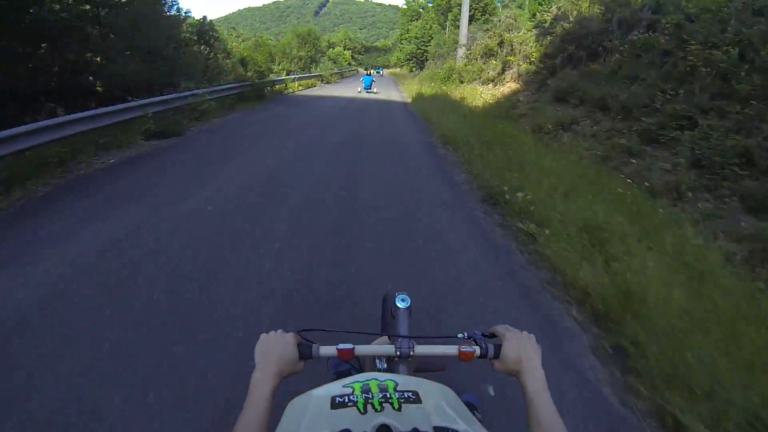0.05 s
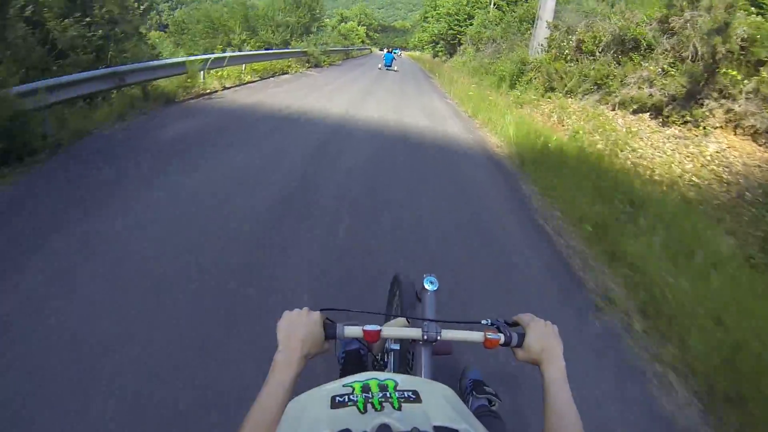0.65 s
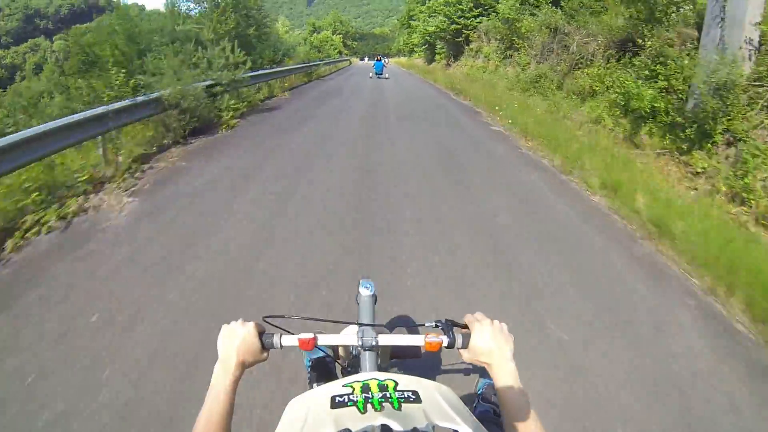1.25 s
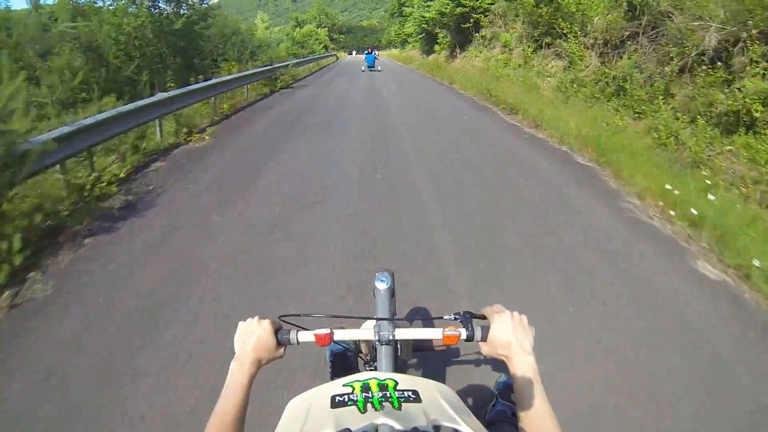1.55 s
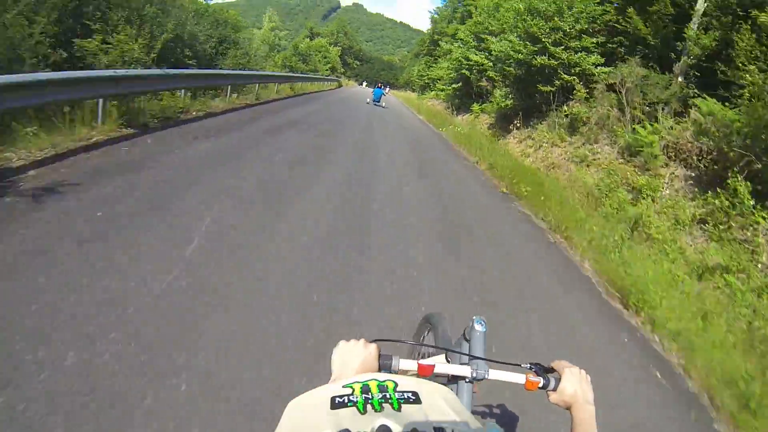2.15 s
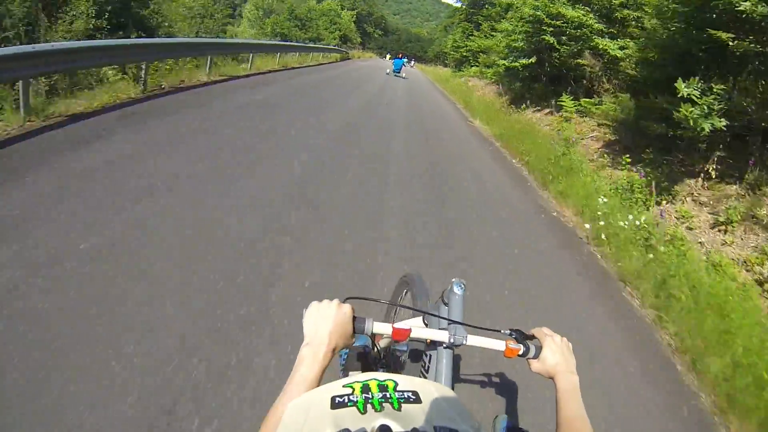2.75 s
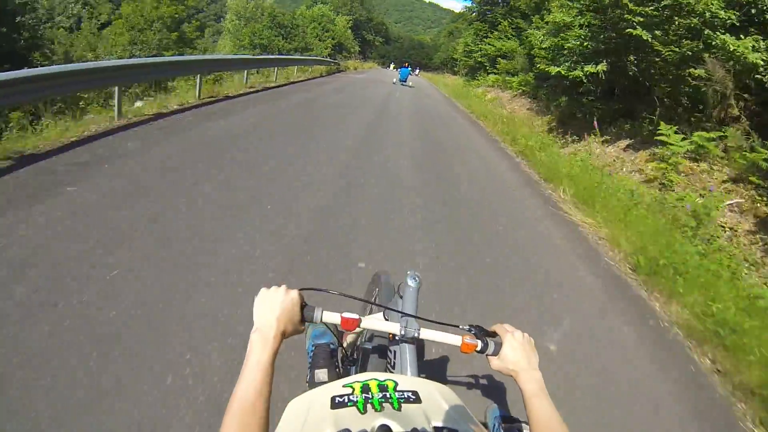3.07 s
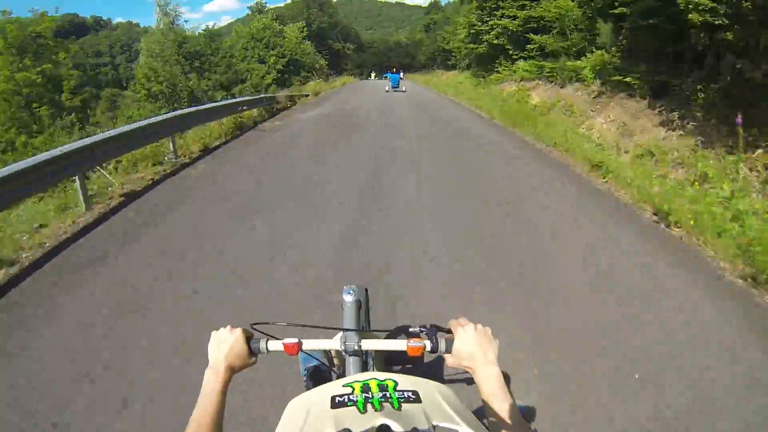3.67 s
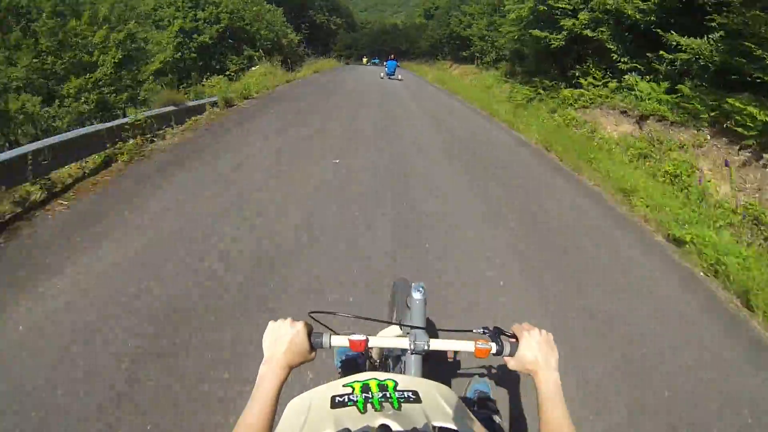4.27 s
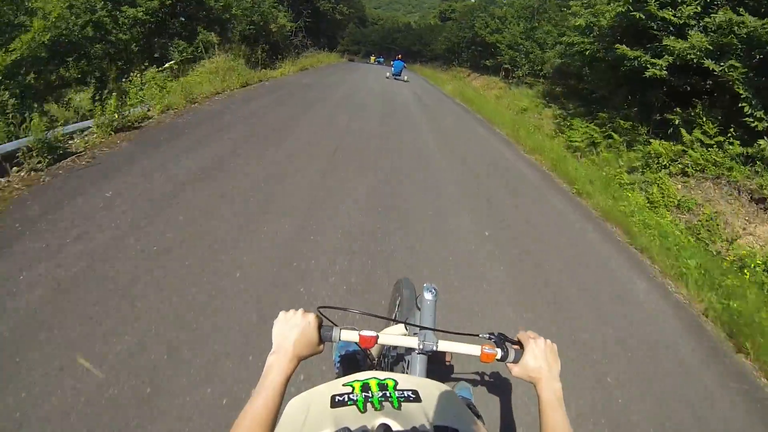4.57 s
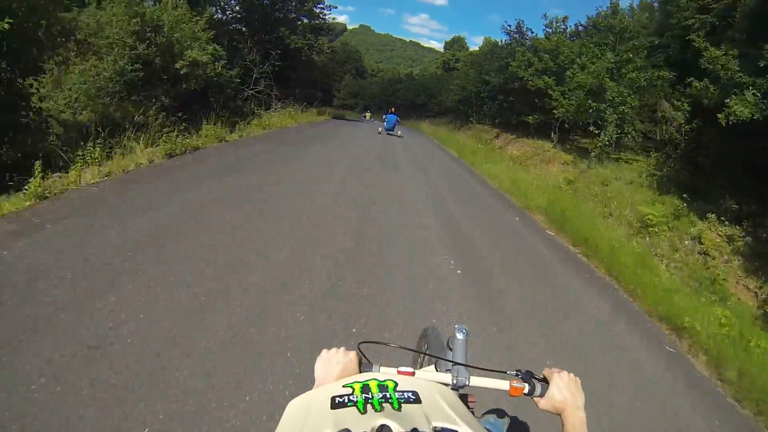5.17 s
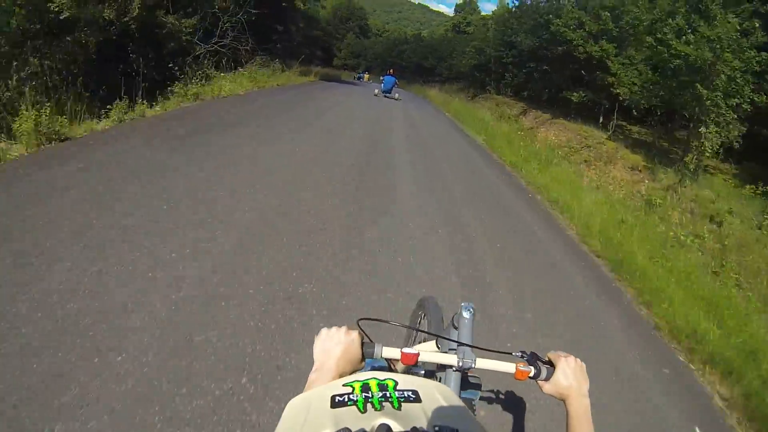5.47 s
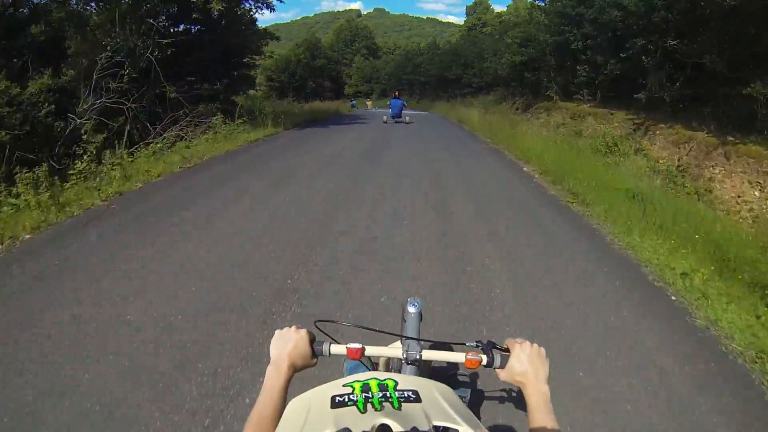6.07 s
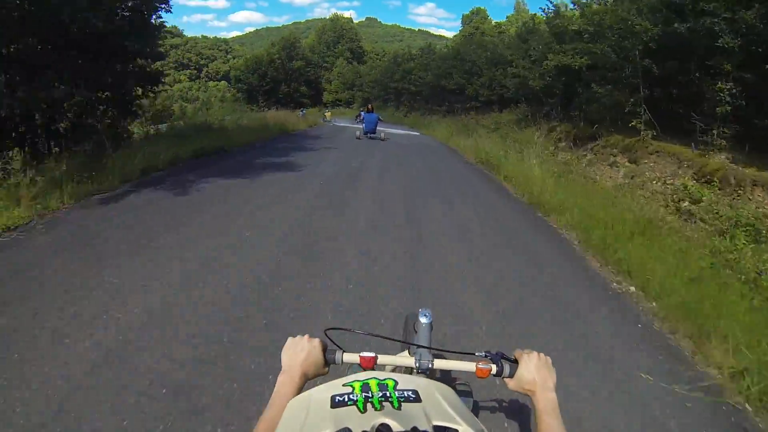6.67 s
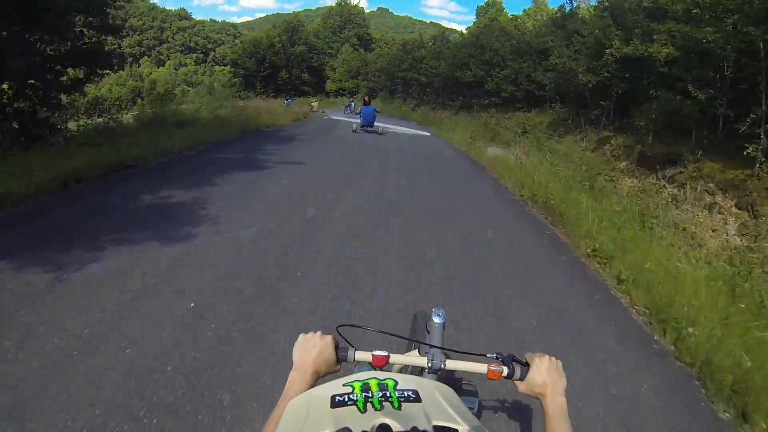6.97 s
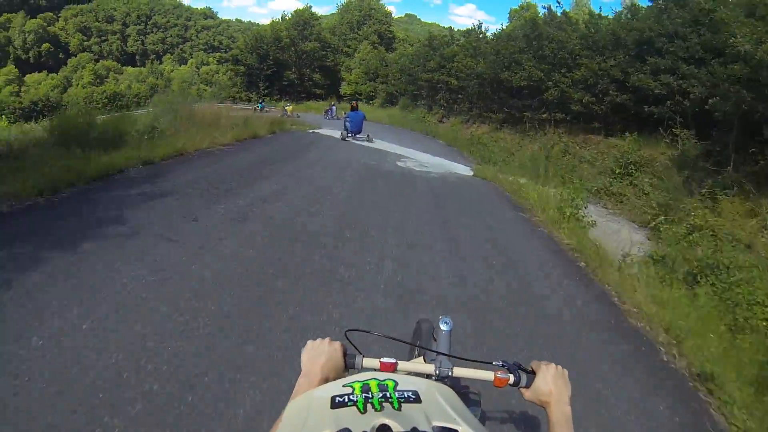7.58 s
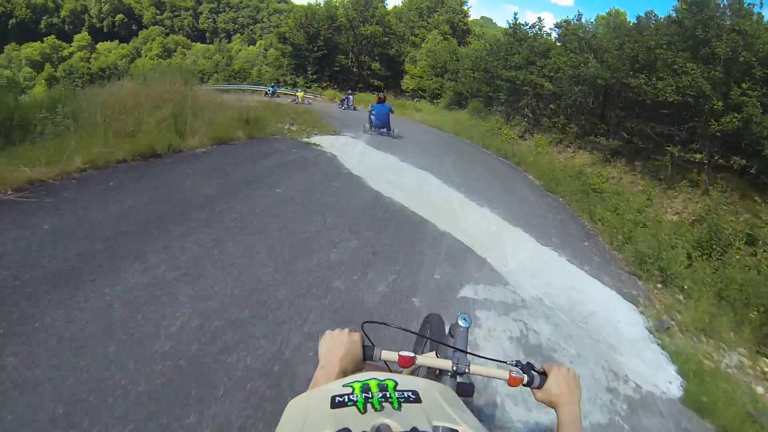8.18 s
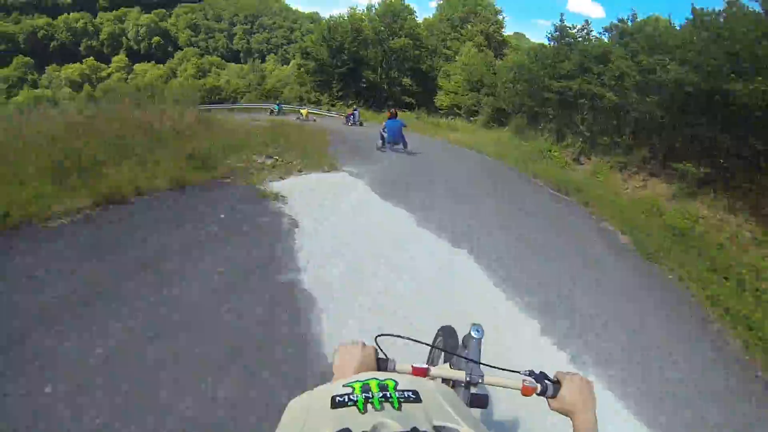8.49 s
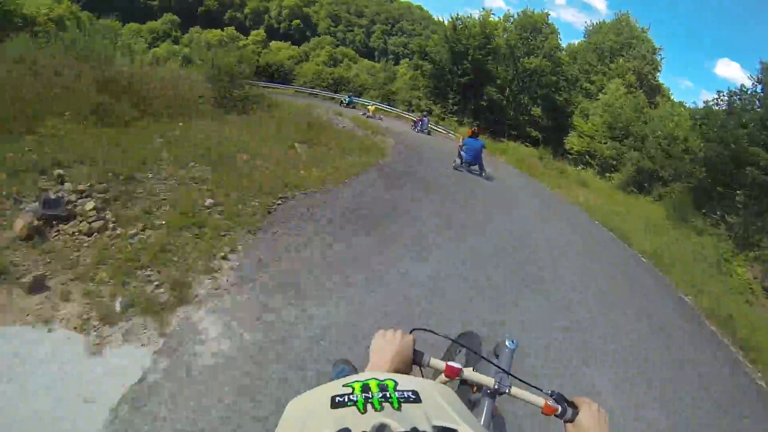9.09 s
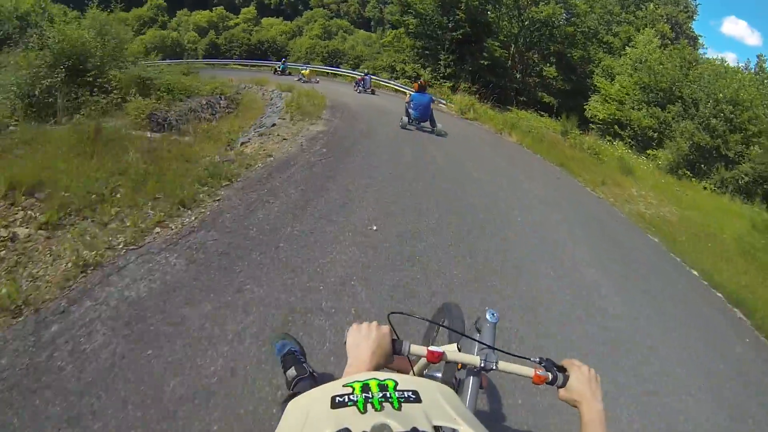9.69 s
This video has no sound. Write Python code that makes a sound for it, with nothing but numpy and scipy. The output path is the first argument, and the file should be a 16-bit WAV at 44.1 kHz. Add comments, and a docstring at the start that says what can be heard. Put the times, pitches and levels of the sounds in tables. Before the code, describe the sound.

Wind buffets the microphone as hard trike wheels roar downhill on asphalt, then slow over grit with stones knocking.

```python
"""On an asphalt road, a gravity trike runs fast downhill with a microphone behind the handlebar.
Turbulent air throbs, buffets and rushes at the microphone and its housing. The grain of the road
drives the hard wheels and the frame by random impacts, so that the wheels roar and the frame hums.
Towards the last bend the pace drops, the rush fades and the rolling turns coarser: friction gives
light rasps and scuffs, grit crunches, and stones knock on the wheels and excite their resonances."""
import sys
import numpy as np
from scipy import signal
from scipy.fft import rfft, irfft, next_fast_len
from scipy.io import wavfile

SR = 44100
rng = np.random.default_rng(int(sys.argv[2]) if len(sys.argv) > 2 else 0)


def dump_mix(stems):
    """Bounce the given channels to the path in sys.argv[1] as a 16-bit WAV at rate SR."""
    frames = np.atleast_2d(stems).T  # one column per channel
    limited = np.clip(frames, -1, 1)  # hard clip at full scale
    pcm = np.round(limited * 32767).astype(np.int16)
    wavfile.write(sys.argv[1], SR, pcm)


N = 433944

# pace of the ride: t/s, pace (0 slowest, 1 fastest)
PACE = [(0, 0.76), (2.4, 0.95), (3.95, 0.89), (4.15, 0.77), (4.6, 0.66), (5.1, 0.43), (6.4, .45), (7, 0.14),
        (9.84, 0.085)]
# gusts on the microphone: onset t/s, duration/s, relative level/dB
GUSTS = [(-0.013, 0.069, -3.5), (0.144, 0.18, -11.5), (0.425, 0.19, -9.5), (0.793, 0.15, -6.5),
         (1.082, 0.25, -11.5), (1.353, 0.098, -6), (1.52, 0.13, -8), (1.857, 0.18, -12), (2.119, 0.27, -10),
         (2.495, 0.15, -6.5), (2.705, 0.045, -2.5), (2.796, 0.17, -9.5), (3.023, 0.042, -3.5),
         (3.163, 0.054, -9), (3.299, 0.21, -9.5), (3.767, 0.1, -13), (3.922, 0.097, -7),
         (4.141, 0.11, -11.5), (4.324, 0.042, -5), (4.393, 0.1, -10.5), (4.55, 0.3, -8.5),
         (4.973, 0.06, -8), (5.042, 0.077, -11), (5.199, 0.15, -8), (5.413, 0.3, -10), (5.74, 0.089, -10.5),
         (5.832, 0.055, -10), (6.18, 0.026, -6.5), (6.35, 0.22, -9), (6.593, 0.34, -6.5),
         (6.875, 0.29, -14), (7.107, 0.18, -10.5), (7.267, 0.32, -11), (7.745, 0.077, -4.5),
         (7.864, 0.079, -4.5), (7.922, 0.6, -9), (8.48, 0.32, -7.5), (8.77, 0.22, -12),
         (9.263, 0.035, -6.5), (9.34, 0.18, -10.5), (9.588, 0.071, -9)]
# turbulence round the housing: t/s, relative level/dB
TURBULENCE = [(0.0, -29.5), (1.1, -37), (1.4, -33), (1.8, -32), (3.3, -35.5), (3.7, -33), (4.6, -35),
              (4.8, -42), (5.05, -35), (5.65, -41.5), (6.2, -36.5), (6.7, -39), (6.85, -49), (7.1, -52),
              (7.4, -38), (7.8, -40), (8.15, -41.5), (8.5, -41), (9.15, -46.5), (9.3, -42), (9.84, -42.5)]
# large eddies that slap the housing: t/s, half-width/s, relative level/dB
SLAPS = [(0.52, 0.026, -32), (0.816, 0.032, -27), (1.35, 0.041, -19), (2.155, 0.045, -29),
         (2.737, .024, -33), (3.852, 0.088, -25), (4.393, 0.023, -36), (4.598, 0.04, -26),
         (5.204, 0.036, -28), (5.474, .02, -25), (6.234, .03, -37), (6.645, 0.021, -19.5),
         (7.793, 0.022, -26), (8.49, 0.024, -28), (8.727, 0.025, -27), (9.293, 0.021, -40)]
# rolling noise on the changing asphalt: t/s, relative roar level/dB, relative scrub level/dB
ROLLING = [(0.0, -22.5, -34.5), (0.6, -22.0, -35), (0.83, -21, -31), (0.92, -28, -39), (1.2, -23, -38),
           (1.7, -24.5, -35.5), (2.1, -22.5, -34.5), (2.55, -25, -32.5), (2.7, -28.0, -34),
           (3.1, -27, -37.5), (3.8, -22.0, -35.5), (4.2, -23.5, -38), (4.6, -23.5, -36), (4.8, -28, -41.5),
           (5.27, -24.5, -40.5), (5.6, -30.5, -43), (5.9, -30, -44), (6.25, -23, -41), (6.5, -26.5, -41.5),
           (6.85, -32, -48), (7.25, -29, -47), (7.55, -30.5, -43), (7.95, -30.5, -47), (8.4, -30.5, -43.5),
           (8.8, -36, -48.5), (9.3, -31, -44.5), (9.84, -30.5, -42)]
# vibration of the frame: t/s, relative rumble level/dB, relative hum level/dB
VIBRATION = [(0.0, -36.5, -29), (0.8, -36.5, -27), (1.05, -39.5, -37.5), (1.65, -40.5, -28.5),
             (1.85, -36, -32.5), (2.5, -37.5, -29.5), (2.9, -39.5, -35), (3.6, -37.5, -30), (3.7, -35, -28),
             (3.87, -36, -23.5), (4.15, -38.5, -30.5), (4.5, -37.5, -35), (4.85, -43.5, -40.5),
             (5.3, -39, -35), (5.7, -40.5, -41.5), (6.0, -41.5, -35.5), (6.3, -38.5, -36.5),
             (6.65, -40.5, -44), (6.8, -47, -42.5), (7.1, -42.5, -45), (7.35, -42.5, -46.5),
             (7.66, -41, -36), (7.85, -42, -48), (8.08, -42, -39), (8.45, -39, -39.5), (8.85, -47.5, -43),
             (9.22, -43.5, -41), (9.36, -43.5, -40.5), (9.84, -38, -43)]
# loose grit under the wheels: t/s, relative level/dB
GRIT = [(0.0, -57), (0.5, -60.5), (0.85, -66), (0.92, -65), (1.43, -66), (1.5, -53.5), (1.58, -62),
        (1.73, -64), (1.78, -54), (2.0, -56), (2.06, -67), (2.13, -59), (2.55, -56), (2.8, -60),
        (3.5, -61.5), (3.95, -59), (4.1, -68), (4.55, -64), (4.85, -73), (5.8, -71), (6.4, -69), (6.8, -75),
        (8.5, -66.5), (9.0, -64), (9.38, -61.5), (9.55, -65), (9.84, -61.5)]
# the airstream separates from the microphone: t/s, half-width/s, attenuation/dB
LULLS = [(0.112, 0.027, 7), (0.43, 0.037, 1.5), (1.82, 0.02, 5), (2.07, 0.032, 14), (2.466, 0.013, 4),
         (2.67, 0.029, 8), (4.3, 0.021, 5), (4.492, 0.012, 3), (6.132, 0.025, 2), (6.528, 0.02, 7),
         (8.28, 0.011, 12), (8.454, 0.012, 10), (9.15, 0.022, 15)]
# stones and bumps strike a wheel: t/s, knock peak level/dB, crack peak level/dB
STONES = [(0.219, -12, -29), (1.4687, -12, -27), (3.183, -17, -35), (3.702, -23, -29), (5.0754, -13, -26),
          (5.265, -10, -27), (5.3427, -12, -30), (5.403, -15.5, -38), (5.6812, -12.5, -33),
          (5.758, -10.5, -34), (5.779, -15, -34), (6.0191, -11.5, -26), (6.1331, -14, -33),
          (6.359, -12, -28), (6.4117, -13, -15), (6.4282, -13, -17), (6.448, -16, -23), (8.127, -22, -24),
          (8.305, -22, -26), (8.4556, -17, -36), (8.952, -21, -33), (8.9784, -21, -31), (8.9972, -26, -21),
          (9.045, -27, -22), (9.12, -19, -27), (9.144, -19, -22), (9.158, -20, -21), (9.299, -16, -28),
          (9.32, -22, -34), (9.336, -17, -35), (9.3605, -32, -30)]
# a tyre slips sideways: onset t/s, duration/s, level/dB
SCUFFS = [(0.35, 0.07, -49), (1.475, 0.055, -46), (3.87, 0.08, -46), (7.67, 0.03, -53), (7.725, 0.058, -55)]
# single grains burst under a wheel: t/s, peak level/dB
SNAPS = [(0.8317, -39), (7.122, -42), (7.147, -44), (7.3848, -40), (7.733, -36), (7.9779, -50),
         (8.214, -44), (8.272, -42), (9.1055, -43), (9.138, -43), (9.1445, -35), (9.208, -40), (9.374, -41),
         (9.3965, -39), (9.4015, -37)]
# a rim rings faintly: t/s, half-width/s, level/dB
WHEEL_RING = (2.3, 0.6, -37)
# thin, very high ticks: t/s, peak level/dB, f/Hz
TICKS = [(1.861, -46, 11300), (6.658, -47, 10100)]
# patches of loose gravel: onset t/s, duration/s, level/dB
GRAVEL = [(6.0, 0.43, -48), (8.12, 0.3, -48), (9.11, 0.13, -42), (9.28, 0.14, -41.5)]
# bumps that jolt the frame: t/s, relative level/dB
BUMPS = [(6.25, -42), (6.65, -40), (7.775, -38), (8.48, -46)]
# light rasps before the bend, probably the brake: onset t/s, duration/s, level/dB
RASPS = [(6.6, 0.071, -63), (7.11, .27, -67), (7.378, 0.3, -61.5), (7.68, .105, -60), (7.785, .345, -70),
         (8.13, 0.33, -61.5)]

# spectral envelopes of the sources: f/Hz, relative level/dB
BUFFET_SPECTRUM = [(10, -2.5), (30, -1.5), (44, -2.5), (58, -3), (80, -11), (120, -13), (165, -10.5),
                   (230, -17.5), (400, -42.5), (1000, -74.5), (5000, -110)]
RUSH_SPECTRUM = [(500, -44), (900, -13.5), (1060, -4), (1300, 4), (1700, -5), (1950, -15.5), (3000, -24.5),
                 (4200, -31.5), (5400, -28), (7000, -40), (15000, -65.5)]
BREEZE_SPECTRUM = [(120, -17), (280, 5), (450, -2), (700, 3), (950, -2), (2000, -35), (15000, -90.5)]
ROAR_SPECTRUM = [(500, -45), (900, -25), (1080, -16.5), (1300, -6.5), (1610, -6.5), (1750, -12.5),
                 (1920, -24), (2230, -15), (2450, -24.5), (3700, -32.5), (4400, -51), (9000, -73.5),
                 (15000, -91.5)]
SCRUB_SPECTRUM = [(1000, -24.5), (1900, -4.5), (2600, 4.5), (3100, -5.5), (3900, -2), (4200, -10.5),
                  (5500, -13.5), (6400, -25.5), (6800, -27), (8100, -32), (8800, -33.5), (12000, -41),
                  (15000, -75)]
RUMBLE_SPECTRUM = [(120, -28.5), (270, -4), (380, 1.5), (490, 1), (570, -2.5), (690, -2), (780, -6.5),
                   (1100, -12), (2000, -40.5), (5000, -57), (15000, -95)]
GRIT_SPECTRUM = [(800, -20), (1500, 2), (3000, -0.5), (4300, -8), (5200, 8), (7000, 1), (7750, -1),
                 (8600, -1), (9600, -5.5), (10700, -4.5), (12200, -12.5), (13500, -13.5), (15000, -24.5)]
KNOCK_SPECTRUM = [(200, -36.5), (900, -26.5), (1250, 8.5), (1550, 14), (1900, -8), (2200, -3.5),
                  (3800, -33.5), (4400, -49.5), (12000, -63.5)]
CRACK_SPECTRUM = [(900, -17), (1700, 8.5), (2200, 9), (3100, 7.5), (3850, -0.5), (4300, -23), (5300, -13),
                  (6500, -31), (9000, -44), (14000, -64)]
SCUFF_SPECTRUM = [(2000, -25), (3600, -6), (4400, 2), (5300, 4), (6200, 1), (7200, -15), (9000, -20),
                  (14000, -42)]
SNAP_SPECTRUM = [(1500, -13), (3500, 0), (5300, 14), (6800, -8), (8500, 0), (11000, -10), (14500, -19)]
TICK_SPECTRUM = [(2000, -12), (9000, -2), (13500, 0), (15000, -15)]
RASP_SPECTRUM = [(2500, -20), (4500, -4), (6300, 1), (7000, -1), (7900, 2), (8600, 2), (9200, -6),
                 (10000, -3), (10800, -15), (11700, -7), (12500, -16), (14000, -26)]

# resonances (notches where the gain is negative): f/Hz, width/Hz, gain/dB
BODY_MODES = [(1047, 39, 2.5), (1430, 98, 1), (1548, 190, 4), (2052, 254, 5.5), (3010, 280, 6),
              (3440, 64, 4), (3980, 160, 1), (4170, 180, -3), (5060, 160, 3), (7750, 500, 9)]  # wheels and microphone housing
WHISTLE_MODES = [(6050, 170, 12), (7620, 350, -1.5)]  # air flowing round the housing
SIZZLE_MODES = [(5170, 250, 9.5), (6410, 260, 9.5), (8080, 400, 3), (9650, 320, 4), (11450, 500, 3.5)]  # high modes that only grit and rasps excite


def from_db(db):
    """Amplitude ratio of a level in decibels."""
    return 10 ** (np.asarray(db) / 20)


def unit_rms(x):
    """Normalisation to unit mean power."""
    return x / np.sqrt(np.mean(x ** 2) + 1e-20)


def in_time(rows):
    """Linear interpolation of each column of a time table at every sample."""
    times, *columns = np.transpose(rows)
    return [np.interp(np.arange(N) / SR, times, column) for column in columns]


def swell(centre_s, half_s):
    """Gaussian envelope of unit height, falling to 1/e at half_s from its centre."""
    distance = (np.arange(N) / SR - centre_s) / half_s
    return np.exp(-np.minimum(distance ** 2, 50))


def contact_envelope(rows, edge_s):
    """Trapezoidal envelopes of sustained contacts: each rises, holds and falls."""
    t = np.arange(N) / SR
    return sum(from_db(db) * np.clip(np.minimum(t - start, start + length - t) / edge_s + .5, 0, 1)
               for start, length, db in rows)


def drift(rate_hz):
    """Random modulation of unit RMS: noise through a two-pole low-pass with its poles at rate_hz."""
    step, settling = 20, 4000
    pole = np.exp(-2 * np.pi * rate_hz * step / SR)
    noise = rng.standard_normal(N // step + settling + 2)
    slow = signal.lfilter([1], [1, -2 * pole, pole * pole], noise)[settling:]
    return np.interp(np.arange(N) / step, np.arange(len(slow)), unit_rms(slow))


def filtered(x, spectrum, modes=()):
    """Minimum-phase filtering by a spectral envelope and its resonances: ringing follows excitation."""
    size = 2 * next_fast_len(N // 2 + SR // 8)
    hz = np.maximum(np.arange(size // 2 + 1) * SR / size, 1)
    point_hz, point_db = np.transpose(spectrum)
    level_db = np.interp(np.log(hz), np.log(point_hz), point_db)
    for centre, width, lift_db in modes:
        level_db += lift_db / (1 + (2 * (hz - centre) / width) ** 2)
    cepstrum = irfft(level_db * np.log(10) / 20)[:size // 2]
    cepstrum[1:] *= 2  # folding onto positive time makes the response causal
    return irfft(rfft(x, size) * np.exp(rfft(cepstrum, size)))[:N]


def response(excitation, spectrum, modes=()):
    """Source-filter principle: the response to a sustained excitation, at unit power."""
    return unit_rms(filtered(excitation, spectrum, modes))


def grains(per_s, spread_db):
    """Shot noise: random impacts, many weak and a few strong, of unit power at any rate."""
    sizes = from_db(spread_db * np.minimum(rng.exponential(1, N), 4))
    signs = rng.choice([-1, 1], N)
    hits = rng.random(N) < per_s / SR
    return unit_rms(sizes * signs * hits / np.sqrt(per_s))


def wavering(hz, rate_hz, evenness):
    """Narrow-band noise of a randomly driven mode; evenness (0-1) steadies its amplitude only."""
    phasor = drift(rate_hz) + 1j * drift(rate_hz)
    phasor /= (np.abs(phasor) + .1) ** evenness
    carrier = np.exp(2j * np.pi * hz * np.arange(N) / SR)
    return unit_rms(np.real(phasor * carrier))


def struck(times, peak_db, spectrum, crunch_s, modes=BODY_MODES):
    """Impact excitation: an impulse and a decaying crunch are convolved with an impulse response."""
    out = np.zeros(N + SR)
    age = np.arange(SR // 25) / SR
    ring = filtered(signal.unit_impulse(N), spectrum, modes)[:len(age)]
    for s, db in zip(times, peak_db):
        crunch = rng.standard_normal(len(age)) * np.exp(-age / crunch_s)
        force = (age == 0) + crunch / np.linalg.norm(crunch)
        blow = signal.fftconvolve(force, ring)
        start = round(s * SR)
        out[start:start + len(blow)] += from_db(db) * blow / np.abs(blow).max()
    return out[:N]


def air_share(pace):
    """Square law: the share of roar and rumble power due to the air grows as pace squared."""
    return 0.57 * pace ** 2


def throb(beat_hz=25.56, sway_hz=15.5, attack_s=0.037, release_s=0.064, floor_db=-20.5, cap_db=-7.8):
    """Flow-induced oscillation: air pumps the microphone in a deep beat and a sway; gusts swell both."""
    t = np.arange(N) / SR
    strength = np.full(N, from_db(floor_db))
    for start, length, db in GUSTS:
        rise = np.clip((t - start) / attack_s + .5, 0, 1)
        fall = np.clip((start + length - t) / release_s + .5, 0, 1)
        strength = np.maximum(strength, from_db(db - 0.74) * rise * fall)
    flutter = from_db(1.4 * drift(8.2))
    strength = np.minimum(strength * flutter, from_db(cap_db))
    beat = np.sin(2 * np.pi * np.cumsum(beat_hz + 2.42 * drift(9.6)) / SR)
    sway = np.sin(2 * np.pi * np.cumsum(sway_hz + 3.014 * drift(5.83)) / SR)
    return strength * (np.sqrt(2) * beat + 0.71 * sway)


def buffeting(lumpy_db=1.1, choppy_db=2.0):
    """Turbulent pressure fluctuation: eddies break on the housing in lumps; a few large ones slap it."""
    level_db, = in_time(TURBULENCE)
    slaps = sum(from_db(db - 6) * swell(s, half_s) for s, half_s, db in SLAPS)
    eddies = rng.standard_normal(N) * from_db(lumpy_db * drift(7.5) + choppy_db * drift(45))
    return (from_db(level_db + 6) + slaps) * response(eddies, BUFFET_SPECTRUM)


def rush(pace, roar_db, rumble_db):
    """Flow noise: air streams round the housing in a hollow, resonant hiss over a dull breeze."""
    hiss = response(rng.standard_normal(N), RUSH_SPECTRUM, BODY_MODES + WHISTLE_MODES)
    breeze = response(rng.standard_normal(N), BREEZE_SPECTRUM)
    return (hiss * from_db(roar_db) + breeze * from_db(rumble_db)) * np.sqrt(air_share(pace))


def frame_hum(hum_db):
    """Forced vibration: the road drives one low mode at random, so its pitch and strength waver."""
    return (from_db(hum_db - 1.6) + jolts()) * wavering(hz=192.1, rate_hz=7.3, evenness=0.24)


def wheels(pace, roar_db, scrub_db, rumble_db, judder_db=1.4):
    """Roughness excitation: asphalt chips strike the hard, bouncing wheels, more densely at speed."""
    load = from_db(judder_db * drift(52))
    hits_per_s = np.interp(pace, [0, 1], [1500, 7000])
    roar = response(load * grains(hits_per_s, spread_db=1.5), ROAR_SPECTRUM, BODY_MODES)
    scrub = response(load * grains(3 * hits_per_s, spread_db=3.5), SCRUB_SPECTRUM, BODY_MODES)
    rumble = response(load * grains(hits_per_s, spread_db=2.5), RUMBLE_SPECTRUM)
    body = roar * from_db(roar_db) + rumble * (from_db(rumble_db) + jolts())
    return body * np.sqrt(1 - air_share(pace)) + scrub * from_db(scrub_db - 1)


def grit(pace, clumping_db=2.5):
    """Crushing noise: sand breaks under the wheels in clumps of tiny impulses."""
    level_db, = in_time(GRIT)
    strength = from_db(level_db + 6 - 1.5 * pace)
    crackle = grains(per_s=4500, spread_db=3.0) * from_db(clumping_db * drift(120))
    return strength * response(crackle, GRIT_SPECTRUM, BODY_MODES + SIZZLE_MODES)


def lulls():
    """Flow separation: the gain of the low wind dips where the airstream leaves the microphone."""
    return from_db(-sum(depth_db * swell(s, half_s) for s, half_s, depth_db in LULLS))


def stones():
    """Modal ringing after impact: each stone gives a hollow knock and a brighter crack."""
    times, knock_db, crack_db = np.transpose(STONES)
    knocks = struck(times, knock_db, KNOCK_SPECTRUM, crunch_s=0.00095)
    cracks = struck(times, crack_db, CRACK_SPECTRUM, crunch_s=0.0011)
    return knocks + cracks


def scuffs(chatter_db=2.0):
    """Sliding friction: a short slip of a tyre makes a dry, grainy scrape."""
    friction = grains(per_s=15000, spread_db=4.0) * from_db(-chatter_db * drift(70))
    return contact_envelope(SCUFFS, edge_s=0.015) * response(friction, SCUFF_SPECTRUM)


def snaps():
    """Brittle fracture: single grains of grit burst with a short, bright snap."""
    times, peak_db = np.transpose(SNAPS)
    return struck(times, peak_db, SNAP_SPECTRUM, crunch_s=0.0018)


def wheel_ring():
    """Resonance: a rim mode swells out of the roar on the fastest stretch and sinks back."""
    s, half_s, db = WHEEL_RING
    return from_db(db) * swell(s, half_s) * wavering(hz=1056, rate_hz=58.0, evenness=0.2)


def ticks(width_hz=3400, lift_db=34):
    """Damped resonance: a tiny contact near the microphone rings briefly round one high pitch."""
    return sum(struck([s], [db], TICK_SPECTRUM, crunch_s=0.0006, modes=[(hz, width_hz, lift_db)])
               for s, db, hz in TICKS)


def gravel(clumping_db=3.0):
    """Superposition of impacts: small stones crack so close together that they blend into a crunch."""
    cracks = grains(per_s=990, spread_db=4.5) * from_db(clumping_db * drift(60))
    return contact_envelope(GRAVEL, edge_s=0.03) * response(cracks, CRACK_SPECTRUM, BODY_MODES)


def jolts():
    """Shock excitation: each bump briefly adds to the amplitude of the hum and the rumble."""
    return sum(from_db(db) * swell(s, half_s=0.012) for s, db in BUMPS)


def rasps(chatter_db=3.5):
    """Frictional excitation: a light rubbing contact hisses in spurts and rings the high modes."""
    friction = grains(per_s=4000, spread_db=4.0) * from_db(chatter_db * drift(70))
    return contact_envelope(RASPS, edge_s=0.035) * response(friction, RASP_SPECTRUM, SIZZLE_MODES)


def scene():
    """Linear superposition: the pressures of wind, rolling and debris add at one microphone."""
    pace, = in_time(PACE)
    roar_db, scrub_db = in_time(ROLLING)
    roar_db += 0.6
    rumble_db, hum_db = in_time(VIBRATION)
    wind = (throb() + buffeting()) * lulls() + rush(pace, roar_db, rumble_db)
    rolling = frame_hum(hum_db) + wheels(pace, roar_db, scrub_db, rumble_db) + wheel_ring()
    rubbing = scuffs() + rasps()
    debris = grit(pace) + gravel() + snaps() + ticks() + stones()
    return (wind + rolling + rubbing + debris)[None]


def record(dry, ceiling=0.9, cutoff_hz=15000):
    """Saturation and band limiting: the hardest peaks are rounded off and the top is cut steeply."""
    rounded = dry / (1 + (dry / ceiling) ** 10) ** (1 / 10)
    low_pass = signal.ellip(10, .2, 80, cutoff_hz, fs=SR, output="sos")
    return signal.sosfilt(low_pass, rounded)


dry = scene()
out = record(dry)
dump_mix(out)
```